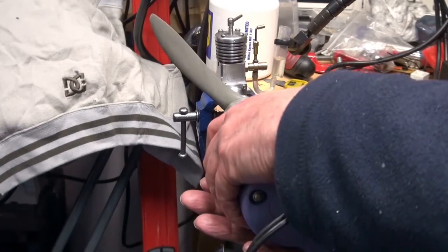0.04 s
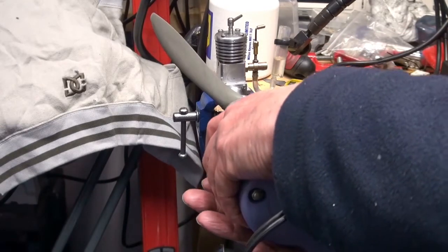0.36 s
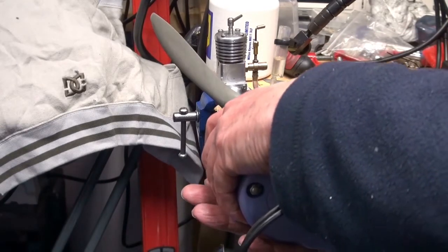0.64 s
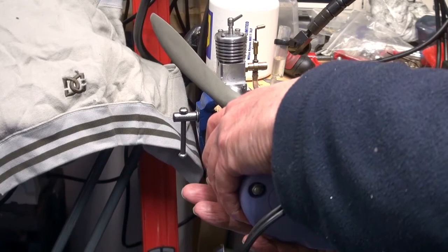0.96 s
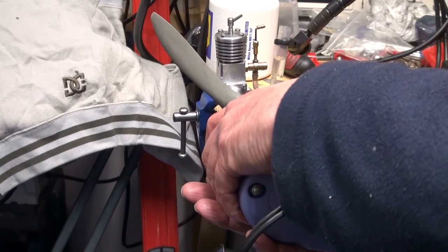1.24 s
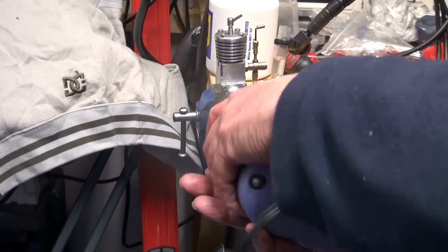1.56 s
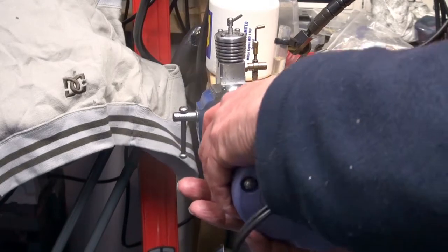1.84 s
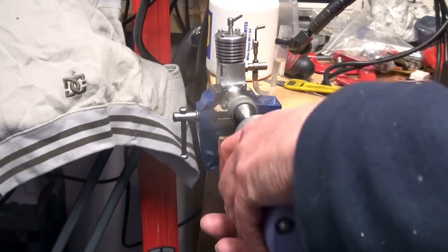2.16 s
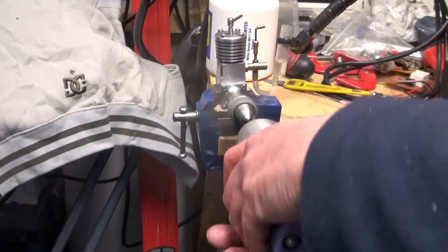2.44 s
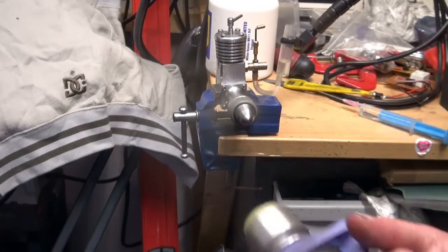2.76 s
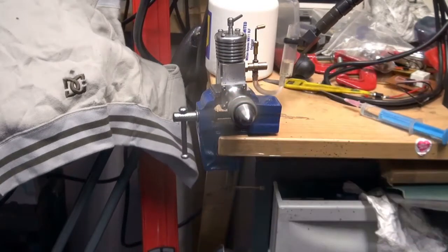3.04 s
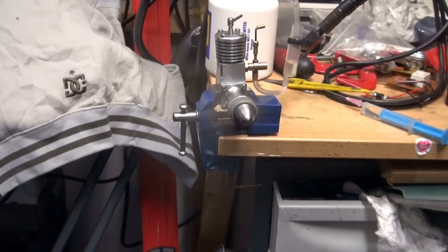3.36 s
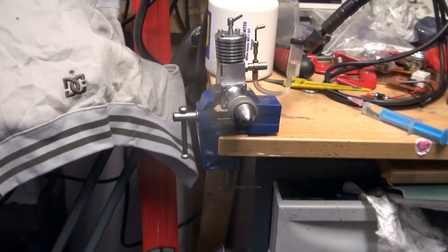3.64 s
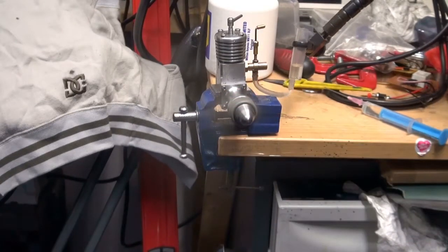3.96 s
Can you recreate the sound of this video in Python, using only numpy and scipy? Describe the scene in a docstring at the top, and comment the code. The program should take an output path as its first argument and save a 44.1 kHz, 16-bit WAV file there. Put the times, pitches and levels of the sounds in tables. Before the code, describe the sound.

A small model engine is cranked by an electric starter, catches and runs loudly.

```python
"""Model diesel engine starting on a bench

A hand-held electric starter knocks the small engine over compression, grinds up to speed and sags.
The engine catches, sputters and speeds up: one exhaust crack a turn rings the workshop bench and vice,
while the two-blade propeller chops the air. A fast limiter holds the peaks."""
import sys
import numpy as np
from scipy import signal
from scipy.fft import rfft, irfft
from scipy.io import wavfile
from scipy.ndimage import uniform_filter1d, minimum_filter1d, map_coordinates

SR = 44100
rng = np.random.default_rng(int(sys.argv[2]) if len(sys.argv) > 2 else 0)


def wav_out(sig):
    """Save sig, one row per channel (or a flat mono array), as 16-bit PCM at SR to the path in sys.argv[1]."""
    wavfile.write(sys.argv[1], SR, np.round(np.clip(np.atleast_2d(sig).T, -1, 1) * 32767).astype(np.int16))


N = 176400

CRANK_S, FIRE_S = 1.545, 2.098  # shaft breaks loose, first firing
# rushing air and gas (frequency [Hz], gain [dB])
HISS = [(60, -30), (200, -11), (500, -3), (850, -1.5), (1400, -0.5), (2100, 0.5), (2700, -1), (5000, -1),
        (7000, -1.5), (9500, -7), (11200, -6.5), (13000, -14.5), (15500, -24)]


def amp(db):
    """Decibels to gain."""
    return 10 ** (np.asarray(db) / 20)


def unit(x):
    """Scale to rms 1."""
    return x / np.sqrt(np.mean(x ** 2) + 1e-20)


def clock():
    """Sample times in seconds."""
    return np.arange(N) / SR


def along(points, hz):
    """Interpolate (Hz, value) points on a log frequency axis."""
    f, v = np.transpose(points)
    return np.interp(np.log(hz + 1), np.log(f + 1), v)


def level(points):
    """Gain from (s, dB) points, silent before the first."""
    return amp(np.interp(clock(), *np.transpose(points), left=-120))


def wobble(rate_hz):
    """Smooth random curve, rate_hz knots a second."""
    return map_coordinates(rng.standard_normal(int(N * rate_hz / SR) + 4), [clock() * rate_hz])


def filtered(x, response):
    """Apply a complex frequency response."""
    return irfft(rfft(x, 2 * N) * response(np.fft.rfftfreq(2 * N, 1 / SR)))[..., :N]


def causal(points):
    """Minimum-phase response from (Hz, dB) points."""
    def response(f):
        cepstrum = irfft(np.log(amp(along(points, f))))
        fold = 1 + np.sign(N - np.arange(2 * N))
        return np.exp(rfft(cepstrum * fold) - cepstrum[0])
    return response


def resonant(modes):
    """Response of (Hz, width Hz, dB) resonances."""
    return lambda f: sum(amp(db) * 1j * f * w / (hz * hz - f * f + 1j * f * w) for hz, w, db in modes)


def noise(spectrum):
    """Noise of rms 1 shaped by (Hz, dB) points."""
    return unit(filtered(rng.standard_normal(N), lambda f: amp(along(spectrum, f))))


def pulses(times_s, sizes):
    """Windowed-sinc impulses placed between samples."""
    at = np.asarray(times_s)[:, None] * SR
    i = at.astype(int) + np.arange(-7, 9)
    taps = np.sinc(i - at) * np.cos(np.pi * (i - at) / 16) ** 2
    return np.bincount(i.ravel(), (taps * np.asarray(sizes)[:, None]).ravel(), N)[:N]


def shaft_hz():
    """Shaft speed from the first turns to running."""
    # each (time [s], speed [turns/s])
    first_turns = [(1.557, 42), (1.583, 32.8), (1.611, 40), (1.635, 45.5)]
    cranking = [(1.66, 51.51), (1.72, 58.45), (1.756, 60.98), (1.904, 66.1), (1.952, 63.67), (2.004, 54.1),
                (2.06, 47.65)]
    catching = [(2.07, 41.3), (2.108, 45.68), (2.15, 50.48)]
    running = [(2.2, 54.5), (2.254, 57.1), (2.374, 61.43), (2.5, 65.33), (2.55, 66.37), (2.75, 68.89),
               (3.076, 69.68), (3.262, 72.14), (3.388, 74.12), (3.608, 76.7), (3.744, 77.58), (3.888, 77.1),
               (4.0, 77.83)]
    return np.interp(clock(), *np.vstack([first_turns, cranking, catching, running]).T)


def turns(since_s):
    """Shaft turns counted from since_s."""
    count = np.cumsum(shaft_hz()) / SR
    return count - np.interp(since_s, clock(), count)


def workshop(x, wet_db, side_db, early_boost=1.07, early_s=0.0098, gap_s=0.0015):
    """Direct sound, dense early echoes from bench and walls, then a short stereo tail."""
    # room decay (frequency [Hz], T60 [s])
    t60 = [(150, 0.27), (1500, 0.3), (6000, 0.18), (14000, 0.093)]
    # side spectrum of the echoes (frequency [Hz], gain [dB])
    width = [(100, -5.5), (300, -12), (550, -4.5), (2000, -7.5), (4500, -7.5), (8000, -5), (11000, -1.5),
             (14000, -40)]
    hz, t, spectra = signal.stft(rng.standard_normal((2, SR // 3)), SR, nperseg=256)
    decay = amp(-60 * t / along(t60, hz)[:, None]) * (1 + early_boost * np.exp(-t / early_s))
    tail = signal.istft(spectra * decay, SR, nperseg=256)[1]
    tail *= np.arange(tail.shape[1]) > gap_s * SR
    mid, side = signal.fftconvolve(x[None], tail / np.linalg.norm(tail[0]), axes=1)[:, :N]
    return x + amp(wet_db) * mid + amp(side_db) * filtered(side, causal(width)) * [[1], [-1]]


def background(air_db=-48, side_db=-9, whine_hz=12630, whine_db=-70.5, wander_hz=80):
    """Quiet workshop air, a low hum and a thin wavering whine."""
    # room air (frequency [Hz], gain [dB])
    air_spectrum = [(15, -51), (25, -26), (59, -9), (77, -9), (144, -9), (178, -4), (204, -11.5),
                    (297, -8.5), (331, -11), (359, -11), (389, -11), (1850, -14), (15500, -35)]
    # hum (frequency [Hz], level [dB])
    tones = [(86.1, -56), (172.3, -61), (301.5, -65.5)]
    t = clock()
    hum = sum(amp(db) * np.sin(2 * np.pi * hz * t + 0.2 * wobble(5.7)) for hz, db in tones)
    pitch_hz = whine_hz + wander_hz * (wobble(14) + wobble(300))
    whine = amp(whine_db) * np.sin(2 * np.pi * np.cumsum(pitch_hz) / SR)
    air = noise(air_spectrum) + amp(side_db) * noise(air_spectrum) * [[1], [-1]]
    return np.sqrt(2) * (hum + whine) + amp(air_db) * air


def shudder(peak_s=1.65, width_s=0.057, hz=86.6, gain_db=-21.5):
    """The bench shakes briefly as the shaft passes its resonance."""
    t = clock()
    swell = np.exp(-((t - peak_s) / width_s) ** 2 / 2) * (t > CRANK_S)
    return amp(gain_db) * swell * np.sin(2 * np.pi * hz * t)


def drone(roughness=0.15):
    """The loaded starter drones at multiples of shaft speed."""
    # (time [s], level [dB])
    envelope = [(1.5, -70), (1.525, -31.5), (1.62, -28), (1.72, -21.5), (1.9, -17.5), (2.02, -20.5),
                (2.1, -32), (2.25, -30.5)]
    # partials (shaft order, gain [dB])
    orders = [(3, -7.5), (4, -7), (5, 1), (6, -13), (7, -12)]
    angle = 2 * np.pi * turns(CRANK_S)
    tone = np.zeros(N)
    for order, db in orders:
        gain = amp(db) * (1 + roughness * wobble(45))
        tone += gain * np.sin(order * angle + roughness * wobble(40) + rng.uniform(0, 2 * np.pi))
    return level(envelope) * unit(tone)


def rasp(rattle_db=4):
    """The starter cup chatters at full cranking speed."""
    # (time [s], level [dB])
    envelope = [(1.6, -35), (1.72, -21), (1.9, -21), (1.93, -34), (2.05, -44)]
    # spinning cup (frequency [Hz], width [Hz], gain [dB])
    modes = [(2200, 460, 4.5), (4230, 510, -4)]
    chatter = rng.standard_normal(N) * amp(rattle_db * wobble(900))
    return level(envelope) * unit(filtered(chatter, resonant(modes)))


def grind(puff_db=5, puff_turns=0.08, rattle_db=2):
    """The starter cup scrapes on the spinner; the unfired cylinder puffs once a turn."""
    # (time [s], level [dB])
    envelope = [(1.51, -44), (1.542, -40), (1.547, -23), (1.59, -20.5), (1.61, -15), (1.7, -16),
                (1.9, -14.5), (1.96, -16), (2.08, -19.5), (2.16, -22.5), (2.4, -39)]
    # scrape (frequency [Hz], gain [dB])
    spectrum = [(30, -33), (70, -9.5), (220, -1), (420, -2.5), (800, -1.5), (1050, -5.5), (1600, -2.5),
                (2700, -7.5), (4500, -6), (6800, -9.5), (9000, -14.5), (12000, -16.5), (15500, -33)]
    puffs = 1 + amp(puff_db) * np.exp(-(turns(FIRE_S) % 1) / puff_turns)
    return level(envelope) * unit(noise(spectrum) * puffs * amp(rattle_db * wobble(700)))


def cup_taps(gain_db=24):
    """The starter cup taps lightly as it takes up slack."""
    # (time [s], strength [dB])
    taps = [(1.501, -31), (1.5119, -22), (1.520, -32), (1.535, -20)]
    # cup (frequency [Hz], width [Hz], gain [dB])
    modes = [(1640, 190, 7.5), (1950, 280, -8), (3100, 600, -17)]
    # soft rubber contact (frequency [Hz], gain [dB])
    contact = [(1500, 0), (3000, -1), (7000, -6), (15000, -22)]
    times_s, db = np.transpose(taps)
    return filtered(pulses(times_s, amp(db + gain_db)), lambda f: resonant(modes)(f) * causal(contact)(f))


def knocks(gain_db=-3, decay_s=0.0018):
    """Hard knocks as the piston is forced over the top."""
    # (time [s], strength [dB])
    compressions = [(1.5447, -2), (1.5677, 0), (1.5979, 1), (1.6228, -5.5)]
    # knock (frequency [Hz], gain [dB])
    spectrum = [(120, -26), (200, 3), (677, -16), (783, -4), (957, -13), (1680, -3.5), (3820, -8),
                (6240, -0.5), (11400, -19), (15500, -25)]
    t = clock()
    blows = sum(amp(db + gain_db) * (t >= s) * np.exp(-np.abs(t - s) / decay_s) for s, db in compressions)
    return blows * noise(spectrum)


def propeller(gain_db=-23.5, depth=0.52, lag_turns=0.13, grain_db=1.5, drift_db=1.46):
    """Two blades tear the air twice a turn, from the first firing on."""
    chop = 1 + depth * np.cos(4 * np.pi * (turns(FIRE_S) - lag_turns))
    gain = amp(gain_db + drift_db * wobble(12)) * (clock() > FIRE_S)
    return gain * unit(noise(HISS) * chop * amp(grain_db * wobble(900)))


def sputter(puff_turns=0.21):
    """Ragged puffs, one a turn, while the engine is cold."""
    # (time [s], level [dB])
    envelope = [(2.09, -30), (2.16, -24), (2.42, -22.5), (2.6, -29), (2.8, -42)]
    # puff resonances (frequency [Hz], width [Hz], gain [dB])
    modes = [(290, 110, -4), (870, 170, 0), (1200, 200, -12), (3450, 360, -15)]
    puffs = rng.standard_normal(N) * np.exp(-(turns(FIRE_S) % 1) / puff_turns)
    return level(envelope) * unit(filtered(puffs, resonant(modes)))


def arm_shadow(x, mids_from_hz=237, mids_to_hz=710, treble_hz=1110):
    """An arm in front of the engine shades the treble and swells the low mids until it moves away."""
    # (time [s], low-mid gain [dB], treble gain [dB])
    shading = [(2.1, 1.5, -5), (2.35, -0.5, -4.5), (2.5, 3, -0.5), (2.7, 2, -1.5), (3.05, 0.5, -1.5),
               (3.25, 0.5, 0), (3.45, -2.5, -2), (3.7, -3, 2), (4, -4, 0)]
    times_s, mids_db, treble_db = np.transpose(shading)
    above = lambda f, hz: 1 - 1 / (1 + (f / hz) ** 12)
    change = lambda db: amp(np.interp(clock(), times_s, db)) - 1
    mids = filtered(x, lambda f: above(f, mids_from_hz) - above(f, mids_to_hz))
    treble = filtered(x, lambda f: above(f, treble_hz))
    return x + mids * change(mids_db) + treble * change(treble_db)


def bench_ring(firings):
    """The firings ring bench, vice and nearby clutter."""
    # (frequency [Hz], width [Hz], gain [dB])
    modes = [(90, 8, -4), (153, 8.6, -9.5), (184.4, 13.5, -3.5), (237, 10.93, -6), (273.7, 36.8, -4),
             (321.2, 22, 0.5), (384, 31, -7.5), (462.2, 65, -6.5), (620, 50, -4), (762.5, 61, -4.5),
             (885, 37, 3.5), (1018.4, 71, -4.5), (1156.6, 54, 0.5), (1292, 67, -7.5), (1466, 27, -4.5),
             (1659, 70, -6), (1880, 51, -7), (2070, 22, -1.5)]
    # driving gas pulse (frequency [Hz], gain [dB])
    push = [(100, -1), (260, 2), (500, -1), (900, 1.5), (1200, -1.5), (2100, 1), (3600, 0), (6000, -9),
            (15000, -28)]
    return unit(filtered(firings, lambda f: resonant(modes)(f) * causal(push)(f)))


def firing_pulses(jitter_s=0.00002, cold_jitter_s=0.00026, warm_up_s=0.21, gas_lead_s=0.000816,
                  scatter_db=0.35, gas_scatter_db=2.5):
    """Pressure and gas impulses, one a turn; the timing steadies as the engine warms."""
    count = turns(FIRE_S)
    times_s = np.interp(np.arange(int(count[-1]) + 1), count, clock())
    slip, size, gas_size = rng.standard_normal((len(times_s), 3)).T
    times_s += slip * (jitter_s + cold_jitter_s * np.exp(-(times_s - FIRE_S) / warm_up_s))
    firings = pulses(times_s, -amp(scatter_db * size))
    gas = pulses(times_s - gas_lead_s, amp(gas_scatter_db * gas_size))
    return firings, gas


def exhaust(crack_db=-29, ring_db=-16, burst_db=-25.5, burst_s=0.002,
            crack_db_per_octave=20, ring_db_per_octave=-0.5, reference_hz=72):
    """Each firing is a burst of gas and a crack that rings the bench; the crack grows with speed."""
    # firing strength (time [s], level [dB])
    envelope = [(2.09, -8), (2.18, -2.5), (2.35, -1), (2.5, 1.5), (2.9, 0.5), (3.25, 2), (3.45, 1.5),
                (3.75, 1), (4, 1.5)]
    # crack (frequency [Hz], gain [dB])
    spectrum = [(60, -55), (500, -27), (1100, -4), (1600, 0), (2400, -0.5), (4000, -6), (7000, -18.5),
                (15000, -38)]
    firings, gas = firing_pulses()
    strength = level(envelope) / np.sqrt(2)
    octaves = np.log2(shaft_hz() / reference_hz)
    crack = amp(crack_db + crack_db_per_octave * octaves) * unit(filtered(firings, causal(spectrum)))
    ring = amp(ring_db + ring_db_per_octave * octaves) * arm_shadow(bench_ring(firings))
    outflow = filtered(gas, lambda f: 1 / (1 + 2j * np.pi * f * burst_s))  # exponential decays
    burst = amp(burst_db) * unit(outflow * noise(HISS))
    port = workshop(strength * (crack + burst), wet_db=-0.5, side_db=-3)
    return port + workshop(strength * ring, wet_db=-9.5, side_db=-6)


def scene():
    """Starter and engine slightly left of centre in the workshop."""
    # stereo balance (frequency [Hz], left minus right [dB])
    balance = [(100, -3), (300, -.3), (1100, 1.5), (4000, 1.8), (9000, 0)]
    starter = amp(-2.5) * grind() + amp(-1.5) * rasp() + cup_taps() + knocks()
    machine = workshop(starter + sputter() + propeller(), wet_db=-3, side_db=-2.5)
    machine += workshop(drone() + shudder(), wet_db=-19.5, side_db=-7)
    machine += exhaust()
    return filtered(machine, lambda f: amp(along(balance, f) * [[0.5], [-0.5]])) + background()


def record(dry, ceiling=0.97, window_samples=90, top_hz=15900):
    """Fast peak limiter, then the band limit."""
    needed = np.minimum(1, ceiling / (np.abs(dry).max(axis=0) + 1e-9))
    gain = uniform_filter1d(minimum_filter1d(needed, window_samples), window_samples)
    return filtered(dry * gain, lambda f: f < top_hz)


dry = scene()
out = record(dry)
wav_out(out)
```